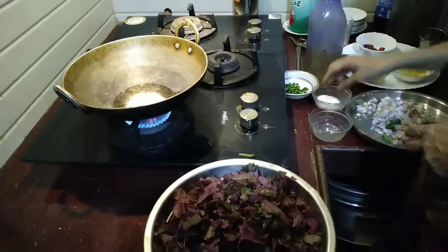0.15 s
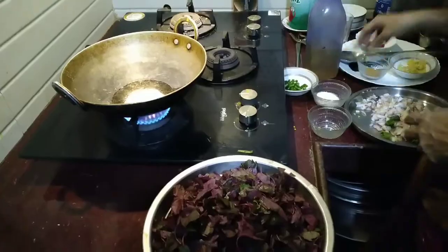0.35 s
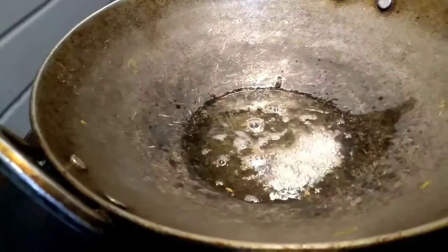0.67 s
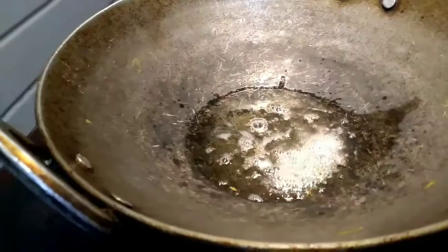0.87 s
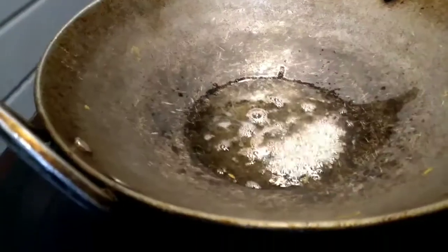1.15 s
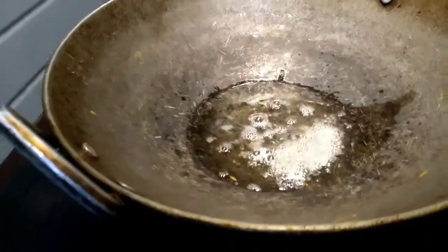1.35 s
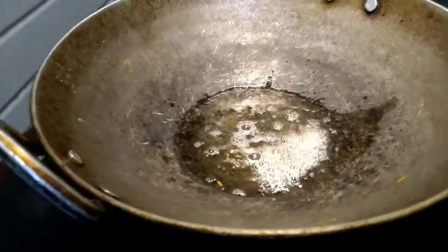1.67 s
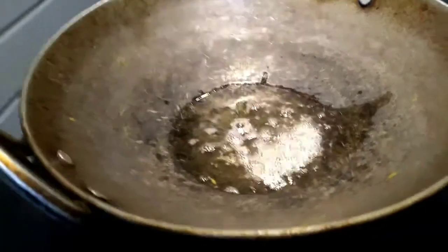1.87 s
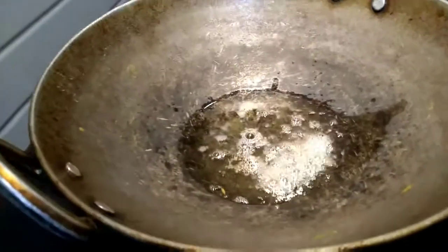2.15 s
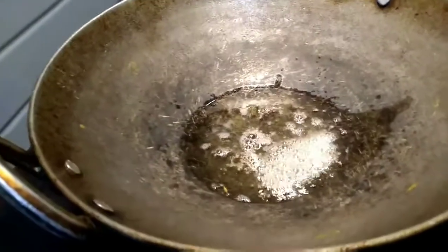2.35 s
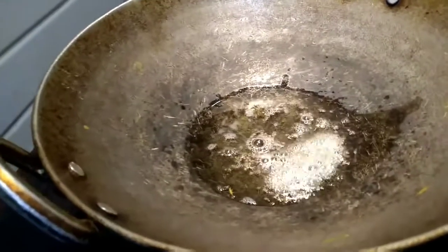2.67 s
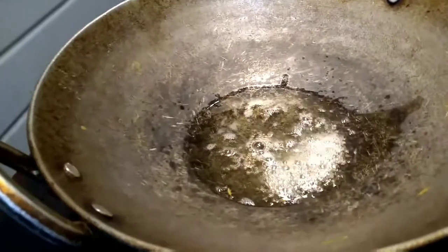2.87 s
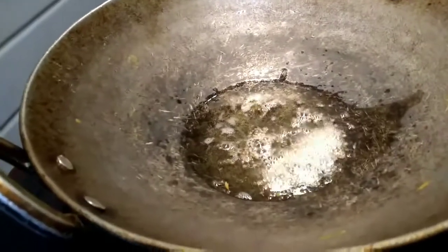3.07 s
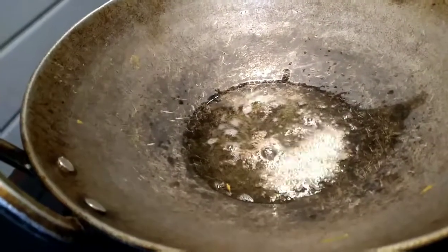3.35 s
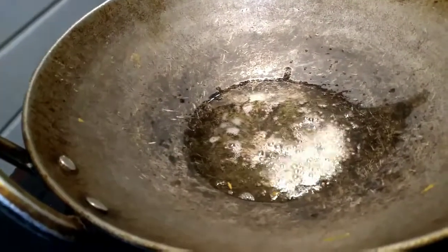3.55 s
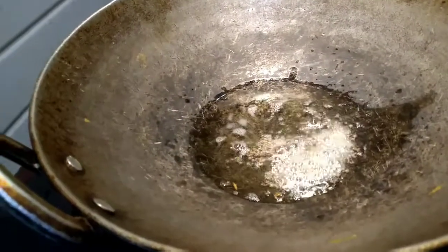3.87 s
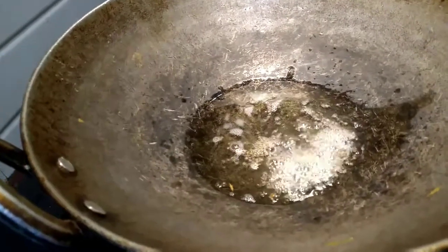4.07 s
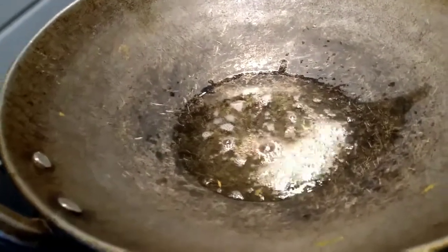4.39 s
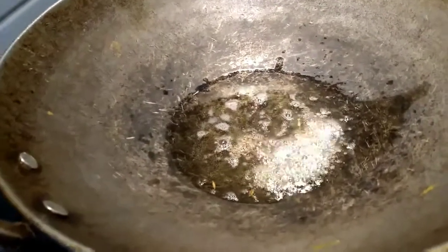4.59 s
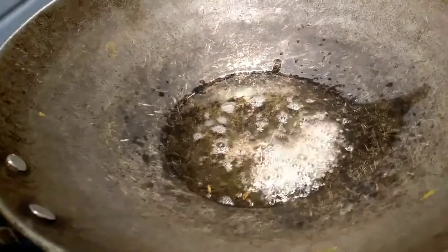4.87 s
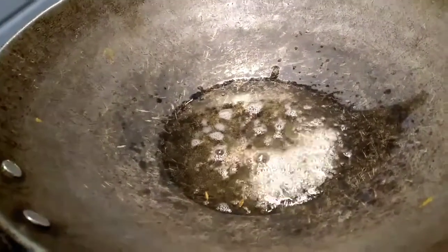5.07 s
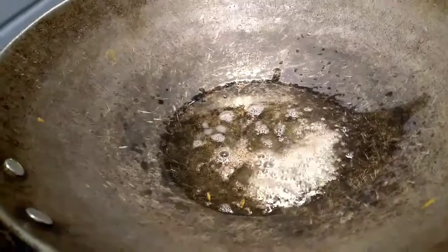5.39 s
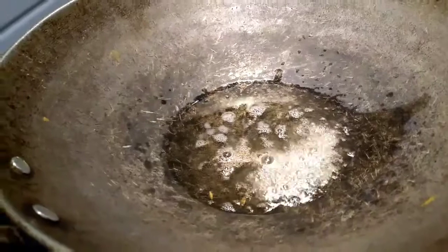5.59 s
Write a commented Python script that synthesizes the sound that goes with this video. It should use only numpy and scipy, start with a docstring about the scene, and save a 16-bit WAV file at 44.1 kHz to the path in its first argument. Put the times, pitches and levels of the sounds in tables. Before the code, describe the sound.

A small bowl clatters down and rattles to rest, then seeds pop and spit irregularly in faintly fizzing hot oil in a kitchen pan.

```python
"""Small seeds burst in hot oil in a round metal pan over a gas flame, in a hard-walled kitchen, one microphone.
Each burst is a dull knock and a bright spit that ring the pan's modes and are thrown round the room.
First a small bowl is set down: a few uneven landings, then rim taps that weaken and quicken to a steady rattle.
Puffs of air brush the microphone as lumpy low noise; two soft low thuds push the counter.
From about 0.9 s the oil fizzes faintly as hiss with tiny bubbles; the kitchen hums as wavering low noise."""
import sys
import numpy as np
from scipy import signal
from scipy.fft import rfft, irfft, next_fast_len
from scipy.io import wavfile
from scipy.ndimage import uniform_filter1d, minimum_filter1d, map_coordinates

SR = 44100
rng = np.random.default_rng(int(sys.argv[2]) if len(sys.argv) > 2 else 0)


def field_ratio(decibels):
    """Amplitude ratio for a level in dB (20 dB per decade); scalars and array-likes work."""
    return 10 ** (np.asarray(decibels, dtype=float) / 20)


def unload_wav(signal):
    """Save mono or channel-first audio to the path in sys.argv[1] as 16-bit WAV at rate SR, clipped to [-1, 1]."""
    wavfile.write(
        sys.argv[1],
        SR,
        np.round(np.clip(np.atleast_2d(signal).T, -1, 1) * 32767).astype(np.int16),
    )


N = 252693


def unit(x):
    """Brought to rms 1."""
    return x / np.sqrt(np.mean(x ** 2) + 1e-20)


def along(points, hz):
    """Values of (Hz, value) points, interpolated on a log frequency axis."""
    point_hz, value = np.transpose(points)
    return np.interp(np.log(hz + 1), np.log(point_hz + 1), value)


def wobble(rate):
    """A smooth random curve, rate knots a second."""
    knots = rng.standard_normal(int(N * rate / SR) + 4)
    return map_coordinates(knots, [np.arange(N) * rate / SR])


def filtered(x, response):
    """x times a complex response of frequency."""
    m = next_fast_len(len(x) + 8192)
    return irfft(rfft(x, m) * response(np.fft.rfftfreq(m, 1 / SR)), m)[:len(x)]


def causal(spectrum):
    """Minimum-phase response of (Hz, dB) points, so that nothing sounds before a blow."""
    def response(hz):
        cepstrum = irfft(np.log(field_ratio(along(spectrum, hz)) + 1e-6))
        half = len(cepstrum) // 2
        cepstrum[1:half] *= 2  # fold the second half onto the first
        cepstrum[half + 1:] = 0
        return np.exp(rfft(cepstrum))
    return response


def modes(table, f):
    """Summed resonances of a struck object, with alternating signs."""
    total = 0
    for k, (pitch_hz, width_hz, level_db) in enumerate(table):
        damping = 1j * f * width_hz
        total = total + (-1) ** k * field_ratio(level_db) * damping / (pitch_hz ** 2 - f * f + damping)
    return total


def noise(spectrum):
    """Random noise of rms 1, coloured by (Hz, dB) points."""
    return unit(filtered(rng.standard_normal(N), lambda hz: field_ratio(along(spectrum, hz))))


def struck(events, gain_db):
    """One impulse for each (s, dB) row."""
    start_s, level_db = np.transpose(events)
    return np.bincount(np.round(start_s * SR).astype(int), field_ratio(level_db + gain_db), N)


# how long the kitchen's reverberation takes to fall 60 dB: pitch_hz [Hz], t60_s [s]
ROOM_DECAY = [(400, 0.37), (1400, 0.31), (3500, 0.37), (9000, 0.43), (14000, 0.12)]


def echoes(near_db, near_s, room_db):
    """A click heard in the kitchen: direct, echoes off close walls until near_s, a tail dying band by band."""
    t = np.arange(SR // 2) / SR
    hz, frame_s, z = signal.stft(rng.standard_normal(len(t)), SR, nperseg=256)
    z = z * field_ratio(-60 * frame_s / along(ROOM_DECAY, hz)[:, None])
    tail = signal.istft(z, SR, nperseg=256)[1][:len(t)]
    tail *= 1 - np.exp(-t / 0.0044)  # the tail builds up
    near = rng.standard_normal(len(t)) ** 3  # sparse: a few strong copies
    near *= field_ratio(-250 * t) / (1 + (t / near_s) ** 8)  # the cluster ends at the farthest close wall
    sound = field_ratio(near_db) * near / np.linalg.norm(near) + field_ratio(room_db) * tail / np.linalg.norm(tail)
    sound[0] += 1
    return sound


# colour of the microphone's own hiss, relative: pitch_hz [Hz], level_db [dB per Hz]
MICROPHONE_HISS = [(800, -39), (1500, -56), (6000, -4), (8000, 7), (10000, 28), (13000, 10.5)]


def self_noise():
    """The microphone's own faint, steady, mostly treble hiss."""
    return field_ratio(-71.5) * noise(MICROPHONE_HISS)


# colour of the kitchen's hum, relative: pitch_hz [Hz], level_db [dB per Hz]
HUM_COLOUR = [(25, -47), (40, -19), (52, 2), (75, -7), (102, 3.5), (135, -9.5), (200, -11), (250, -13),
              (300, -6.5), (400, -18), (480, -11), (600, -19.5), (800, -15.5), (1100, -40), (1500, -26.5),
              (3000, -100)]


def hum():
    """The kitchen's low hum: noise with peaks in its spectrum, wavering in level."""
    return field_ratio(-43.5 + 1.5 * wobble(7)) * noise(HUM_COLOUR)


# colour of the oil's fizz and of the puff's hiss, relative: pitch_hz [Hz], level_db [dB per Hz]
SIZZLE_COLOUR = [(710, -14), (1200, -0.5), (1450, -5), (2130, -4.5), (2760, -6), (3370, -12.5),
                 (4790, -11.5), (5570, -12.5), (8150, -11), (13200, -24)]
# a faint hiss before the oil is heard, level of its smooth part: start_s [s], level_db [dB]
EARLY_HISS = [(0, -61), (.07, -50.5), (.18, -55.5), (.4, -90), (.6, -71.5), (.8, -74)]
FIZZ_FROM_S, FIZZ_DB = 0.92, -63.5  # heard once the microphone is at the pan; middle level of the smooth part
STIR_DB, STIR_S = -19, 0.047  # level relative to the spit's table level; time to calm down


def fizz():
    """A faint early hiss, then hot oil: hiss with tiny bubbles bursting in it, stirred up by every seed."""
    t = np.arange(N) / SR
    bursting = rng.random(N) < 300 / SR  # about 300 bubbles a second
    bubbles = bursting * rng.standard_normal(N) * field_ratio(1.6 * np.minimum(rng.exponential(size=N), 3))
    in_room = signal.fftconvolve(bubbles, echoes(near_db=4.0, near_s=0.013, room_db=-7.0))[:N]
    crackle = unit(filtered(in_room, causal(SIZZLE_COLOUR)))
    spits = struck([(start_s, spit_db) for start_s, _, _, spit_db, _ in SEEDS], gain_db=STIR_DB)
    # each spit starts an exponential decay
    stirred = np.abs(filtered(spits, lambda f: SR * STIR_S / (1 + 2j * np.pi * f * STIR_S)))
    start_s, level_db = np.transpose(EARLY_HISS)
    early = field_ratio(np.interp(t, start_s, level_db))
    level = np.where(t < FIZZ_FROM_S, early, field_ratio(FIZZ_DB + 4 * wobble(8)))
    return level * (noise(SIZZLE_COLOUR) + field_ratio(2) * crackle) + stirred * crackle


# colour of air on the microphone, relative: pitch_hz [Hz], level_db [dB per Hz]
AIR_COLOUR = [(24, -47), (40, -8), (92, -0.5), (190, -4.5), (284, -10), (443, -11), (1010, -15.5),
              (1460, -34), (2140, -29), (5000, -72), (6500, -62), (11000, -120)]
GUST_AT_S, GUST_RISE_S, GUST_HOLD_S, GUST_FALL_S = .79, .15, 0.14, 0.21
GUST_DB, GUST_HISS_DB = -33, -46  # rms while it holds: low rumble, treble hiss
EARLY_GUST_DB, EARLY_GUST_FADE_S = -33.5, 0.12  # an earlier puff still dying away at the start


def gust():
    """Turbulent air on the port: lumpy low noise that swells, holds and dies, with a thin hiss on top."""
    t = np.arange(N) / SR
    corners_s = GUST_AT_S + np.cumsum([0, GUST_RISE_S, GUST_HOLD_S, GUST_FALL_S])
    blowing = np.interp(t, corners_s, [0, 1, 1, 0])
    lumps = unit(field_ratio(2.9 * wobble(69.86) + 1.5 * wobble(24.9)) * noise(AIR_COLOUR))
    early = field_ratio(EARLY_GUST_DB) * np.exp(-t / EARLY_GUST_FADE_S)
    hiss = blowing * field_ratio(GUST_HISS_DB) * noise(SIZZLE_COLOUR)
    return (blowing * field_ratio(GUST_DB) + early) * lumps + hiss


# pushes on the counter, levels relative: start_s [s], level_db [dB]
COUNTER_THUDS = [(5.019, -28.5), (5.172, -14.5)]
# the counter's resonances, levels relative: pitch_hz [Hz], width_hz [Hz], level_db [dB]
COUNTER_MODES = [(70, 19.5, 4), (176, 45, 1), (915, 1200, -27)]


def thuds():
    """Soft low pushes set off the heavily damped modes of the counter."""
    return filtered(struck(COUNTER_THUDS, gain_db=40), lambda f: -modes(COUNTER_MODES, f))


# the bowl touches, lands and hops, levels relative: start_s [s], level_db [dB]
BOWL_LANDINGS = [(.0735, -34.5), (.1812, -15), (.1837, -4.5), (.2317, -3.5), (.2607, -6)]
# colour of the bowl's blow, relative: pitch_hz [Hz], level_db [dB per Hz]
BOWL_BLOW = [(260, -47), (450, -14.5), (548, -16.5), (736, -9), (1600, -1), (2440, -18.5), (3230, -19.5),
             (4460, -39.5), (5510, -32.5), (7940, -43.5), (13000, -43)]
# the bowl's resonances, levels relative: pitch_hz [Hz], width_hz [Hz], level_db [dB]
BOWL_MODES = [(965, 25, -6), (1200, 48, -3), (1504, 64, 3.5), (1500, 8, -4), (1608, 11, 10), (1660, 21, -7),
              (2210, 58, -12), (3150, 61, 0), (5440, 210, -27)]
ROCK_S, ROCK_SHRINK, ROCK_MIN_S = .024, .71, .0057  # first swing, the next over it, the shortest
ROCK_DB, ROCK_LOSS_DB = -6.5, 2.13  # first tap of the rim on the landings' scale, loss a tap


def bowl():
    """Uneven landings, then weakening rim taps ring the bowl's modes; all from one spot, with the same echoes."""
    k = np.arange(11)
    swings_s = np.maximum(ROCK_S * ROCK_SHRINK ** k, ROCK_MIN_S)
    taps_s = BOWL_LANDINGS[-1][0] + np.cumsum(swings_s)
    landings = BOWL_LANDINGS + list(zip(taps_s, ROCK_DB - ROCK_LOSS_DB * k))
    blow = causal(BOWL_BLOW)

    def response(f):
        # the ring follows the blow's colour by only half its dB
        ring = field_ratio(-5.5) * modes(BOWL_MODES, f) / field_ratio(along(BOWL_BLOW, f) / 2)
        return blow(f) * (1 + ring)

    knocks = filtered(struck(landings, gain_db=28.0), response)
    return signal.fftconvolve(knocks, echoes(near_db=-6, near_s=.014, room_db=-3))[:N]


# seeds bursting, a dull knock and a bright spit each, levels relative:
# start_s [s], knock_db [dB], knock_hz [Hz], spit_db [dB], spit_hz [Hz]
SEEDS = [(1.2545, -37, 1500, -35, 3080), (1.2828, -45, 1210, -38, 3900), (1.3349, -25.5, 1820, -30.5, 5240),
         (1.3936, -30, 2940, -33.5, 9200), (1.4517, -18, 1880, -32.5, 11800),
         (1.5491, -30.0, 1830, -26, 4240), (1.7175, -42.5, 1460, -52, 3000),
         (1.7657, -44.5, 2060, -46, 4900), (1.7859, -29, 1200, -26.5, 3950),
         (1.8034, -22.5, 2090, -30.0, 9200), (1.8099, -26.0, 1360, -46, 5500),
         (1.951, -27.0, 2340, -42, 4200), (1.9581, -22, 1510, -26.5, 3860),
         (2.0138, -31.5, 1790, -34, 3460), (2.208, -26, 1970, -41.0, 9400),
         (2.2387, -39, 1200, -30.5, 4150), (2.4, -19.5, 1690, -34.5, 4500),
         (2.4237, -22.5, 1510, -26.5, 4500), (2.4871, -27.5, 2300, -37.0, 11500),
         (2.5092, -31, 4030, -27.5, 4230), (2.629, -35, 2050, -33, 5000), (2.65, -37, 1200, -34.0, 3750),
         (2.6873, -25.5, 2530, -42.5, 8700), (2.772, -27, 1780, -27.5, 4170),
         (2.8348, -27.5, 1700, -25.0, 3970), (2.8821, -28, 1990, -53, 12000),
         (2.9986, -41, 2560, -28.5, 12300), (3.0556, -28.5, 2140, -38, 4260),
         (3.086, -22.5, 1890, -25, 4200), (3.1217, -31, 1550, -21.0, 5200),
         (3.3766, -38.5, 1770, -46, 4740), (3.4523, -23, 1330, -37.0, 4250),
         (3.477, -29.5, 2700, -33, 6400), (3.5774, -39.5, 1200, -22, 7000), (3.645, -40, 1890, -42, 5600),
         (3.6528, -42, 2540, -22.5, 7840), (3.6656, -51, 1200, -32, 5600), (3.7293, -21, 1200, -26, 3000),
         (3.7499, -21.5, 2600, -38.5, 12000), (3.8628, -30, 2380, -45, 12000),
         (3.8715, -34, 1200, -34.5, 6800), (3.9074, -23.5, 2490, -29.5, 6660),
         (4.0787, -31, 1950, -36.0, 4100), (4.0881, -21.5, 1210, -34.5, 3600),
         (4.0956, -26, 2620, -30.5, 6600), (4.1357, -36, 1200, -28.0, 5150),
         (4.2646, -27.5, 2130, -28, 5500), (4.3053, -21.5, 1400, -23.5, 4540),
         (4.3474, -46, 1190, -31.0, 10700), (4.5725, -26, 1200, -61, 12000),
         (4.5818, -24.0, 1620, -28.0, 4940), (4.7663, -34, 1930, -26.5, 4470),
         (4.7834, -34, 3420, -40, 4300), (4.85, -27.5, 2060, -36.5, 5900), (4.9117, -49, 1200, -26, 5040),
         (5.0712, -26.5, 1710, -24.5, 4100), (5.1846, -35.5, 2160, -35.0, 4850),
         (5.2858, -33.0, 1800, -45, 7600), (5.3829, -30.5, 1800, -27.0, 5700),
         (5.4423, -38.5, 1200, -32.0, 3400), (5.469, -57, 1200, -33, 5300),
         (5.4987, -20.0, 1840, -31.5, 4900), (5.546, -28, 1540, -30.5, 3160),
         (5.6653, -35, 4070, -35, 3530)]
# centres of the bands in which a burst's colour is worked out: pitch_hz [Hz]
COLOUR_HZ = [1360, 2250, 3560, 7020, 10900]
# fall below (two rows) and above (last row) those bands, from the nearest one: pitch_hz [Hz], level_db [dB]
COLOUR_ENDS = [(500, -17), (950, -5.5), (14000, -12)]
# the pan's resonances, middle levels, relative: pitch_hz [Hz], width_hz [Hz], level_db [dB]
PAN_MODES = [(1330, 114, -5.5), (1467, 95, 9), (2068, 176, -1.5), (2030, 150, -11), (2898, 26, 1.5),
             (3510, 29, 7), (5640, 600, -3.5), (8360, 680, 6)]
# echoes off the pan's far side and the wall behind, relative to the direct click: start_s [s], level_db [dB]
CLOSE_ECHOES = [(.0023, -8.5), (.0083, -3)]
KNOCK_FALL_DB, SPIT_FALL_DB = 16, 7  # loss one octave from the centre; grows with the square of the distance


def burst_colour(power):
    """Causal response, peak level and power-weighted centre of a burst, from its power in each band."""
    per_hz = 10 * np.log10(power) - 10 * np.log10(COLOUR_HZ)  # wider bands hold less per Hz
    top_db = per_hz.max()
    per_hz = per_hz - top_db
    low = [(hz, per_hz[0] + fall_db) for hz, fall_db in COLOUR_ENDS[:2]]
    high = [(hz, per_hz[-1] + fall_db) for hz, fall_db in COLOUR_ENDS[2:]]
    colour = causal(low + list(zip(COLOUR_HZ, per_hz)) + high)
    return colour, top_db, np.average(COLOUR_HZ, weights=power)


def pops():
    """Each seed is a click of its own colour that rings the pan and is thrown round the room."""
    out = np.zeros(N + SR)
    spots = rng.standard_normal((len(SEEDS), len(PAN_MODES)))
    for (start_s, knock_db, knock_hz, spit_db, spit_hz), spot in zip(SEEDS, spots):
        # where it bursts decides which modes sound
        rung = [(hz, width_hz, level_db + 2.5 * d) for (hz, width_hz, level_db), d in zip(PAN_MODES, spot)]
        knock = field_ratio(knock_db - KNOCK_FALL_DB * np.log2(np.divide(COLOUR_HZ, knock_hz)) ** 2)
        spit = field_ratio(spit_db - SPIT_FALL_DB * np.log2(np.divide(COLOUR_HZ, spit_hz)) ** 2)
        colour, top_db, centre_hz = burst_colour(knock ** 2 + spit ** 2)
        heard = echoes(near_db=1.5, near_s=.011, room_db=5.5)
        heard[0] = 0  # the direct click comes from the blunted clicks instead
        clicks = struck([(0.00019, 0)] + CLOSE_ECHOES, gain_db=0)[:len(heard)]
        # deep bursts are blunt, only bright ones snap
        heard += filtered(clicks, lambda f: field_ratio(3.5) / (1 + 1j * f / (1.6 * centre_hz)) ** 2)
        pop = filtered(heard, lambda f: colour(f) * (field_ratio(-2.0) + modes(rung, f)))
        out[round(start_s * SR):][:len(pop)] += field_ratio(top_db + 62.5) * pop
    return out[:N]


def scene():
    """Everything reaches the one microphone, which adds its own hiss; both channels carry the same."""
    mono = self_noise() + hum() + fizz() + gust() + thuds() + bowl() + pops()
    return np.array([mono, mono])


# level at which the suppressor halves the amplitude: pitch_hz [Hz], level_db [dB per bin]
SUPPRESSOR_THRESHOLD = [(700, -130), (1200, -75.5), (4000, -99), (13000, -108)]


def suppressed(x):
    """Noise suppressor: each band is turned down, by 14 dB at most, as its level sinks to the threshold."""
    hz, _, z = signal.stft(x, SR, nperseg=512)
    power = uniform_filter1d(np.abs(z) ** 2, size=3, axis=1)
    power = np.abs(uniform_filter1d(power, size=5, axis=2))
    threshold = field_ratio(along(SUPPRESSOR_THRESHOLD, hz))[:, None]
    gain = np.maximum(power / (power + threshold ** 2), field_ratio(-14))
    return signal.istft(z * gain, SR, nperseg=512)[1][:, :N]


WIDE_FROM_HZ = 4100


def widened(pair):
    """In random patches of treble without a sharp click, left and right become unrelated noise of like power."""
    hz, at_s, z = signal.stft(pair, SR, nperseg=1024)
    treble = (hz > WIDE_FROM_HZ)[:, None]
    power = np.abs(uniform_filter1d(np.abs(z[0]) ** 2, size=16, axis=0))
    # a click is treble power well above that just before it
    fine = uniform_filter1d(filtered(pair[0], lambda f: f > WIDE_FROM_HZ) ** 2, size=40)
    before = uniform_filter1d(fine, size=300, origin=149)
    calm = minimum_filter1d(fine < 6 * before, size=1024)
    steady = calm[np.minimum(at_s * SR, N - 1).astype(int)]
    # the patches: spells shared by all bands, varied from band to band
    spells = uniform_filter1d(rng.standard_normal(len(at_s)), size=5)
    bands = uniform_filter1d(rng.standard_normal((33, len(at_s))), size=4)
    bands = np.repeat(bands, 16, axis=0)[:len(hz)]
    wide = treble & steady & (unit(spells) + .6 * unit(bands) > .05)
    fresh = signal.stft(rng.standard_normal(pair.shape), SR, nperseg=1024)[2]
    fresh *= field_ratio(-0.2) * np.sqrt(power / np.mean(np.abs(fresh) ** 2))
    return signal.istft(np.where(wide, fresh, z), SR, nperseg=1024)[1][:, :N]


def band_limit(x):
    """A steep low-pass at the top of the band."""
    return signal.sosfilt(signal.butter(12, 14400, fs=SR, output="sos"), x)


def record(dry):
    """Noise suppressor, wide treble, then little left above the band limit of 13300 Hz."""
    wide = widened(suppressed(dry))
    limited = np.array([filtered(x, lambda hz: np.where(hz < 13300, 1, field_ratio(-39))) for x in wide])
    return band_limit(limited)


dry = scene()
out = record(dry)
unload_wav(out)
```